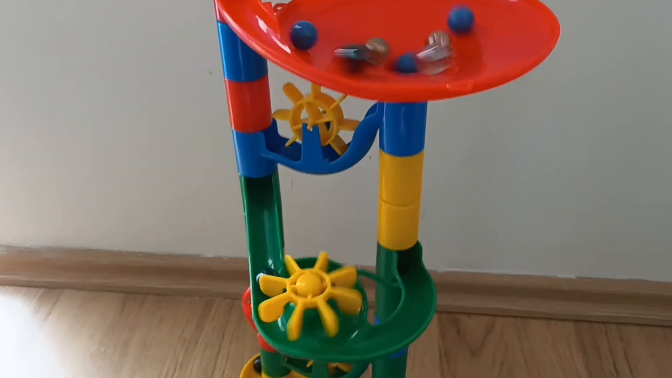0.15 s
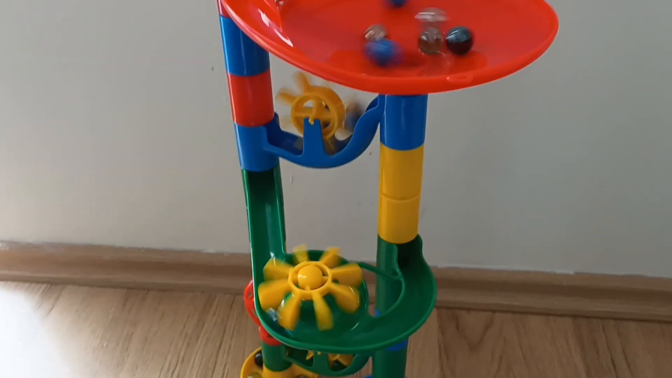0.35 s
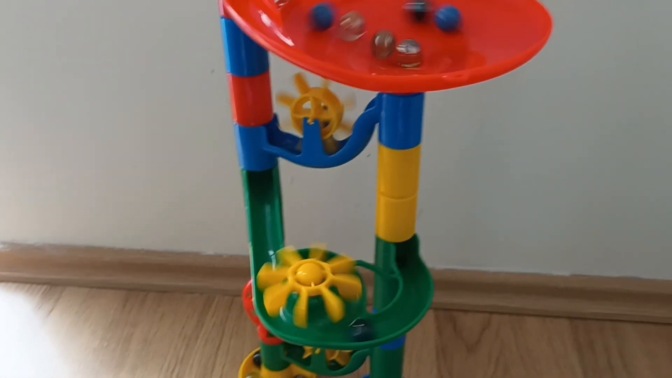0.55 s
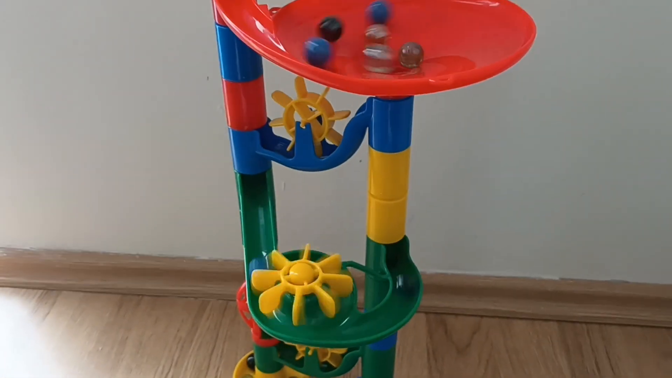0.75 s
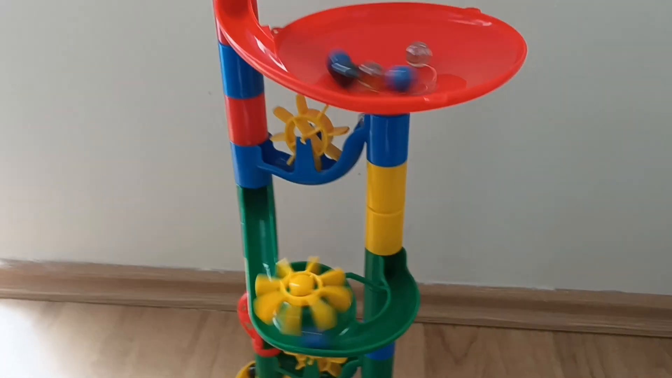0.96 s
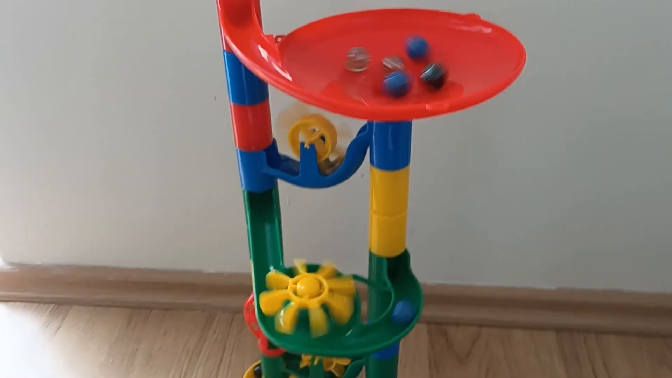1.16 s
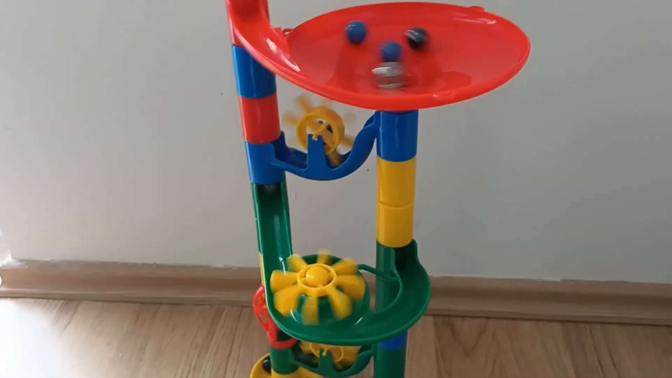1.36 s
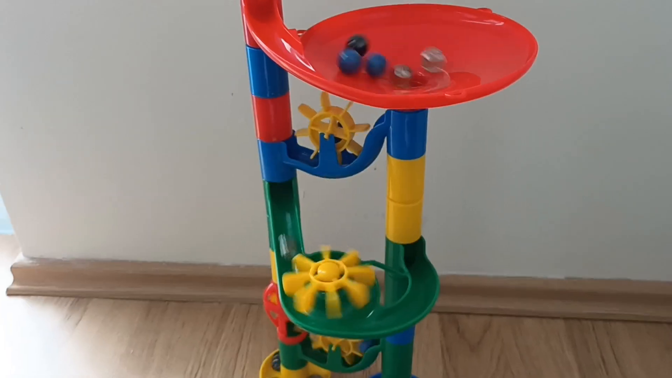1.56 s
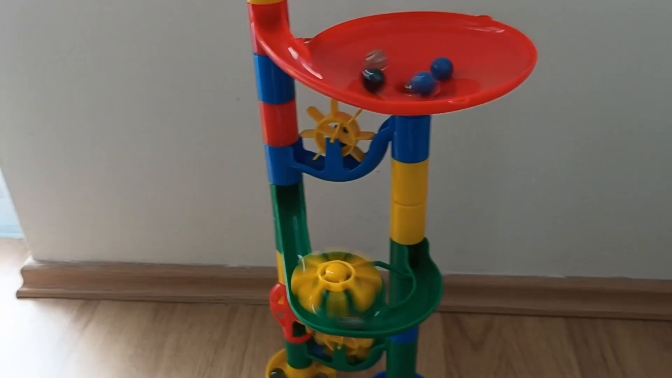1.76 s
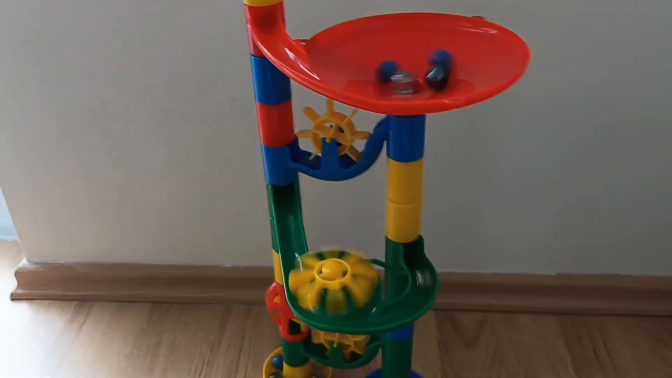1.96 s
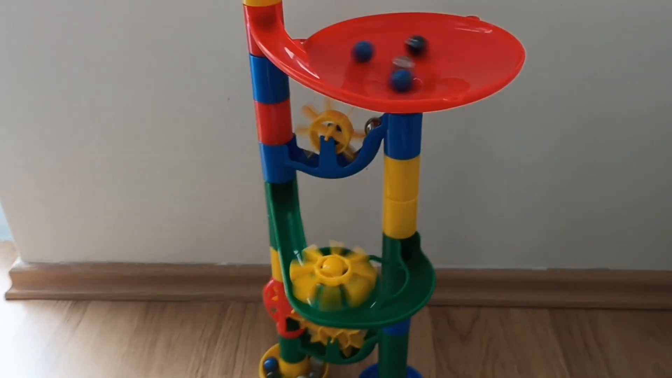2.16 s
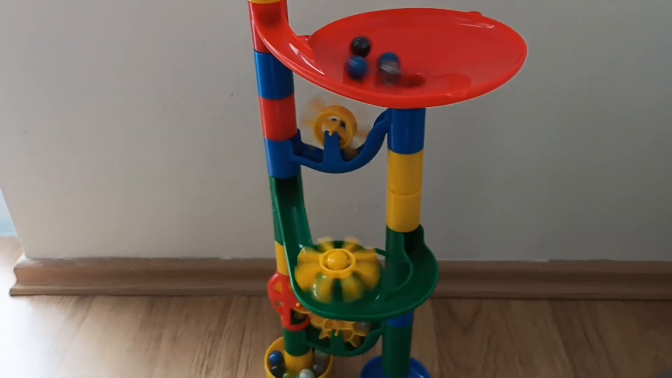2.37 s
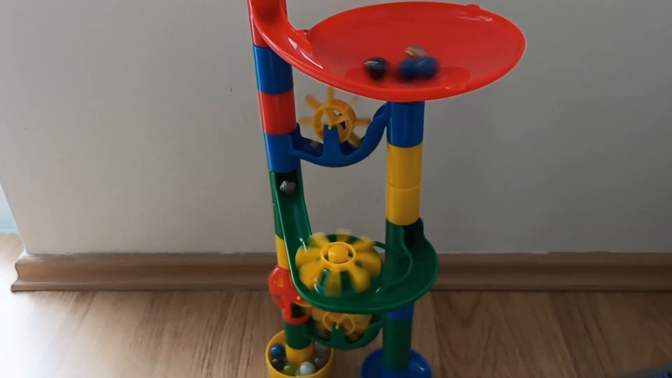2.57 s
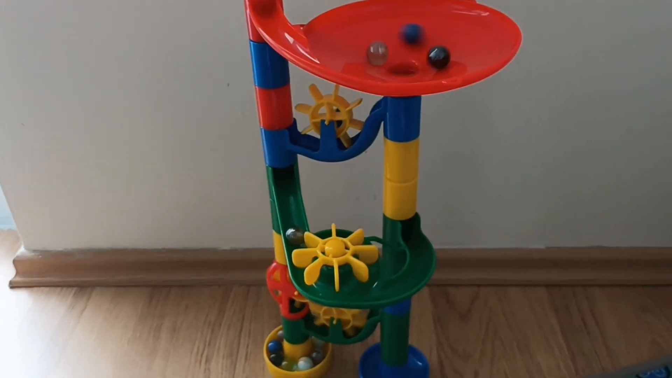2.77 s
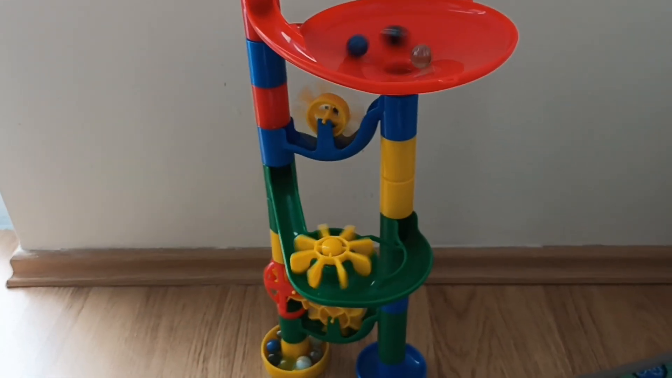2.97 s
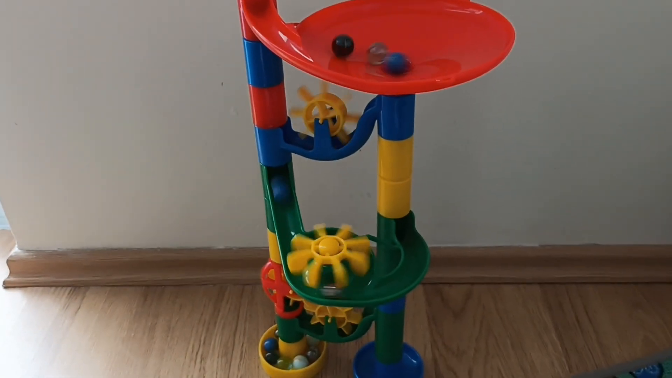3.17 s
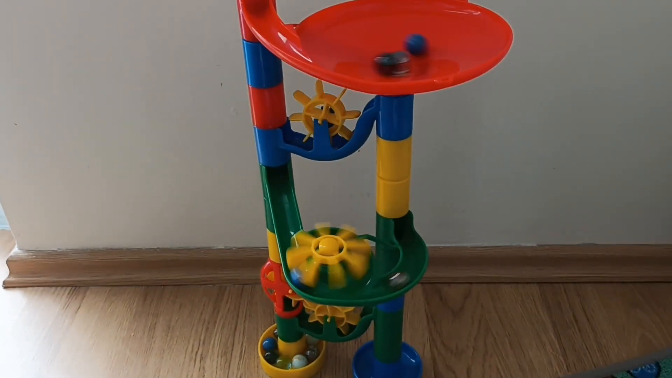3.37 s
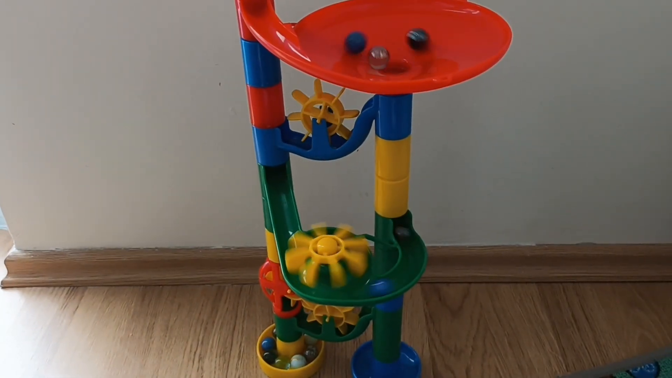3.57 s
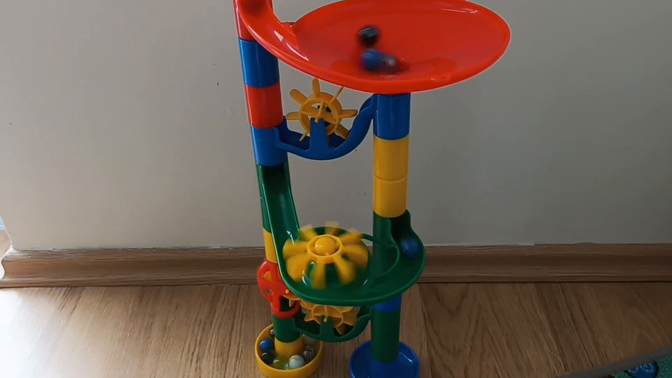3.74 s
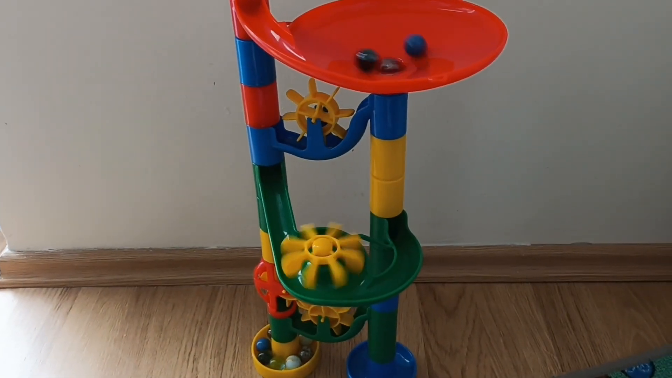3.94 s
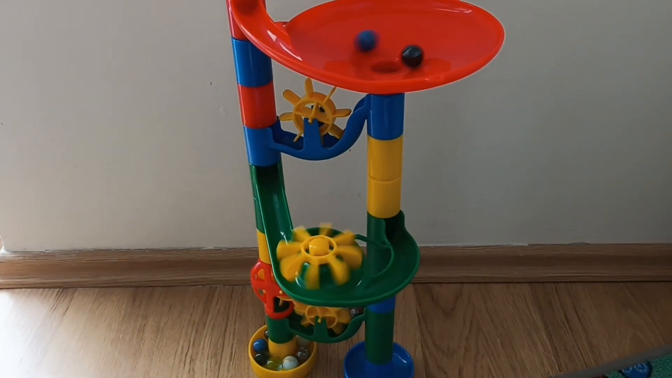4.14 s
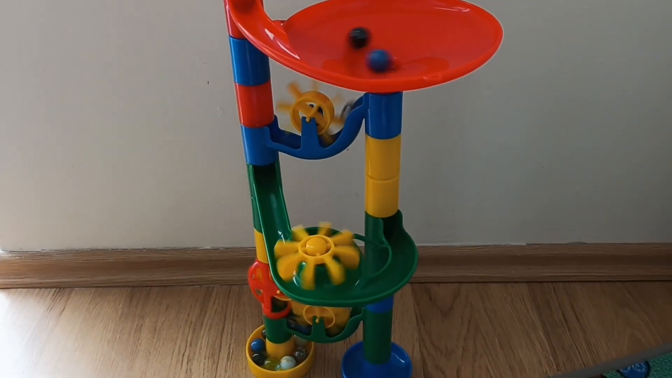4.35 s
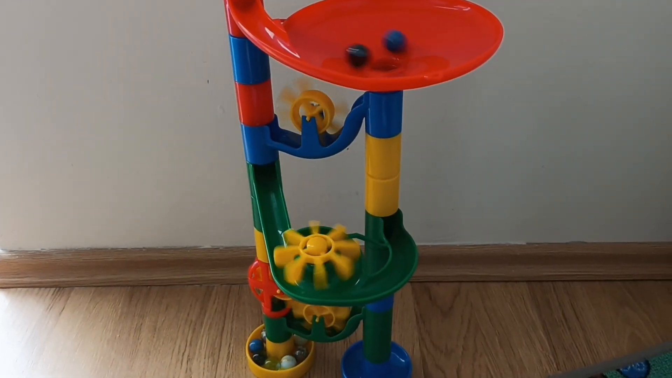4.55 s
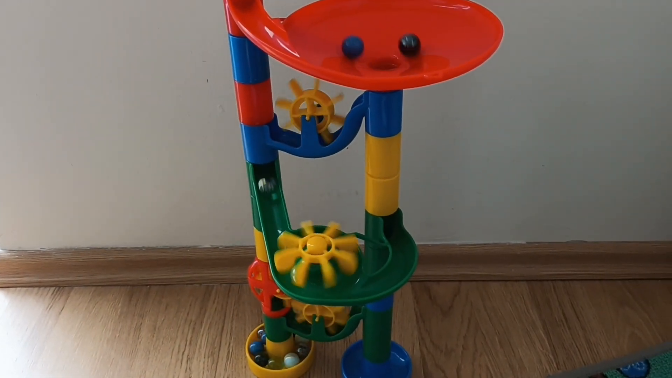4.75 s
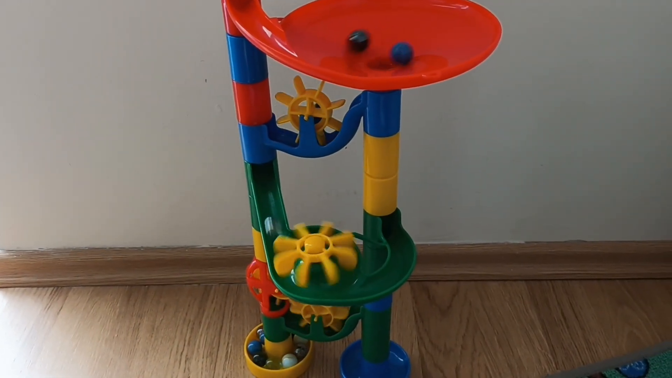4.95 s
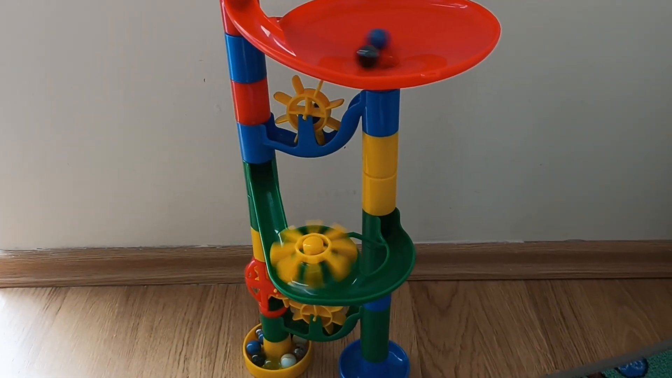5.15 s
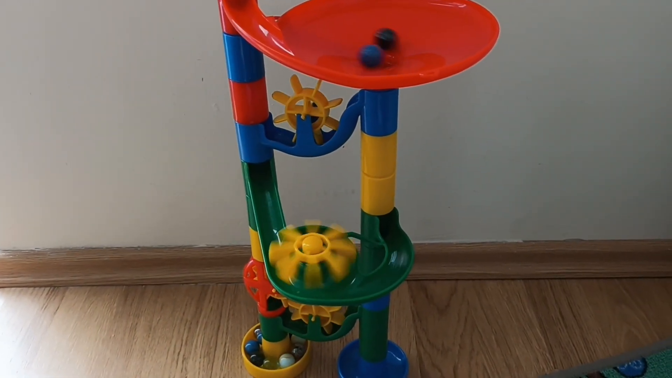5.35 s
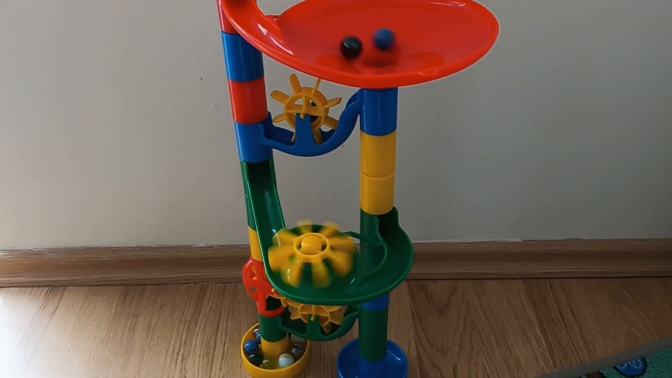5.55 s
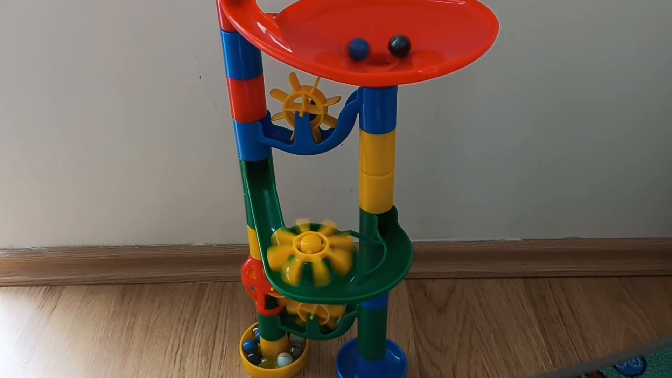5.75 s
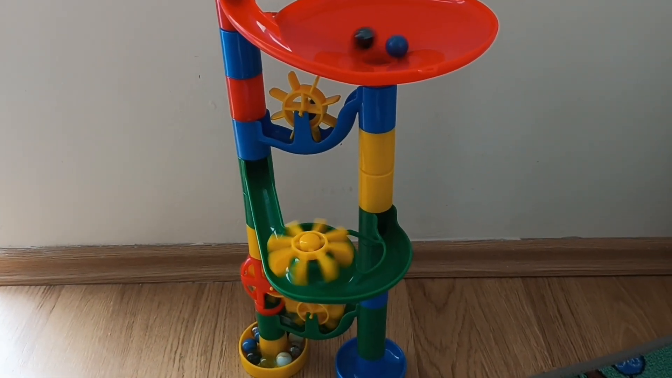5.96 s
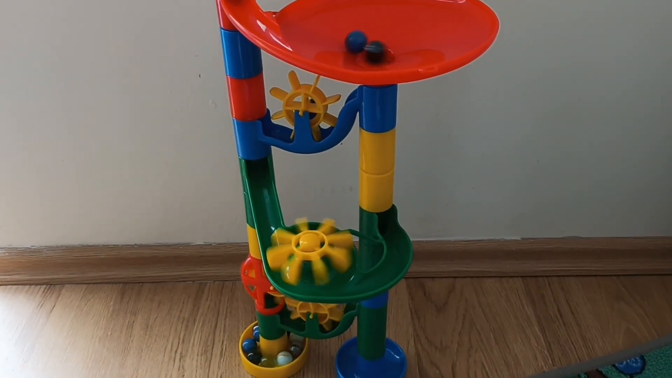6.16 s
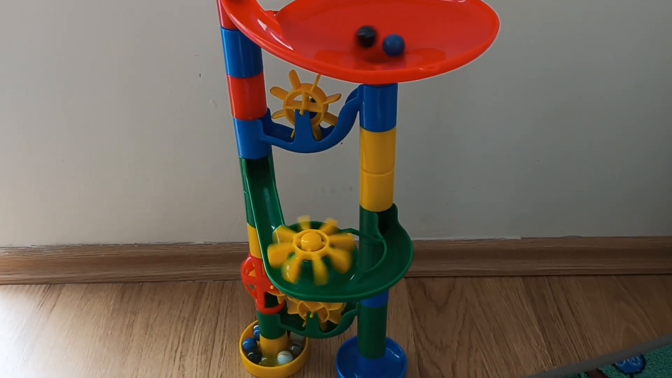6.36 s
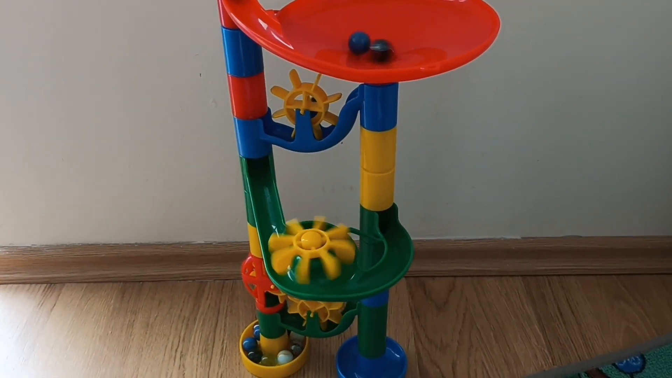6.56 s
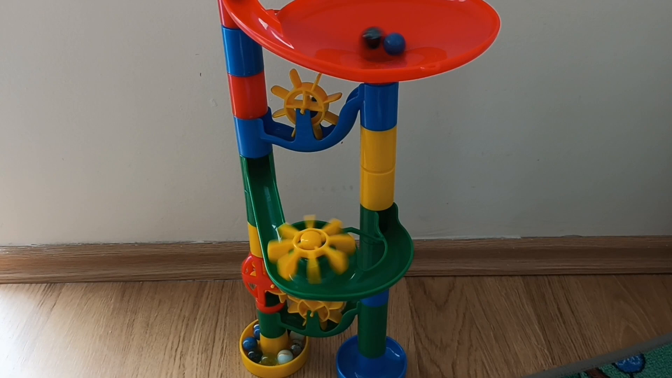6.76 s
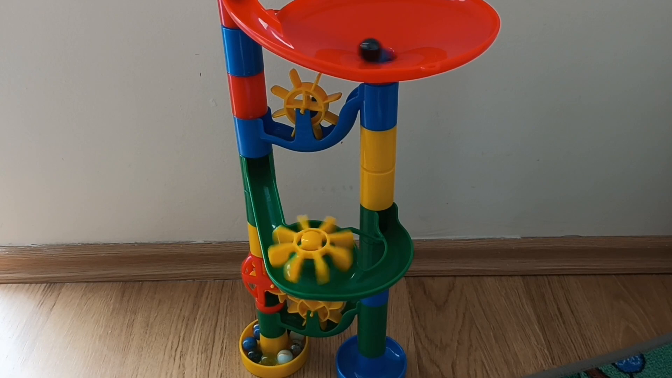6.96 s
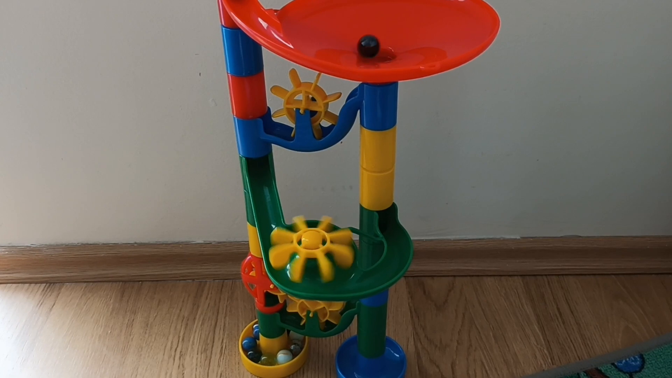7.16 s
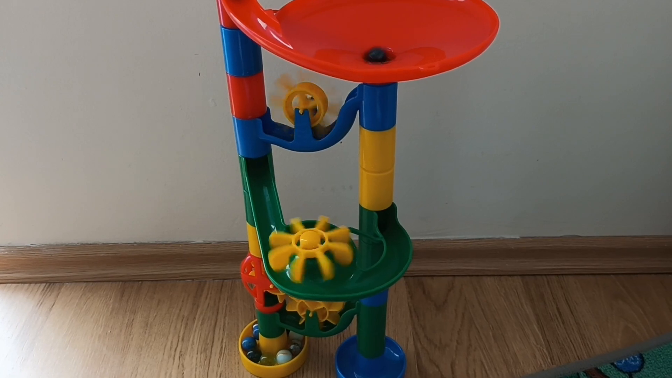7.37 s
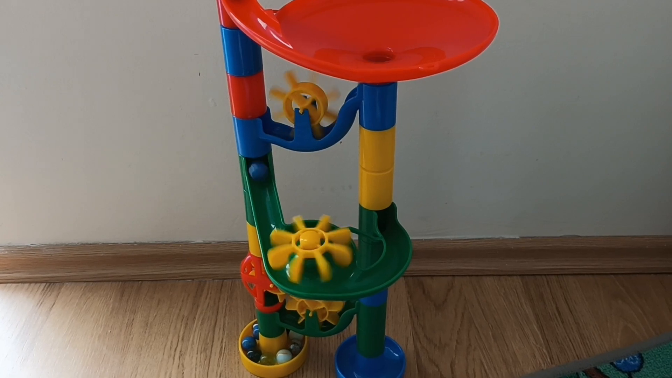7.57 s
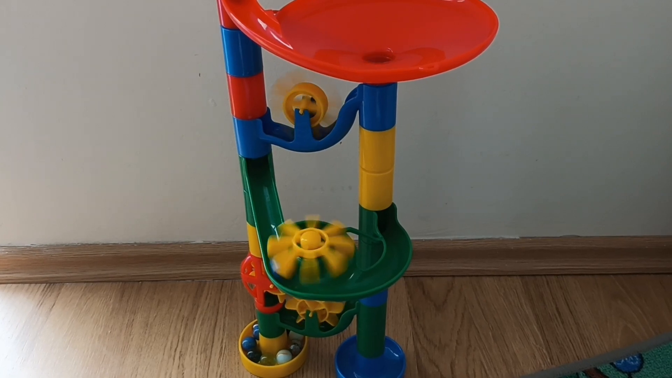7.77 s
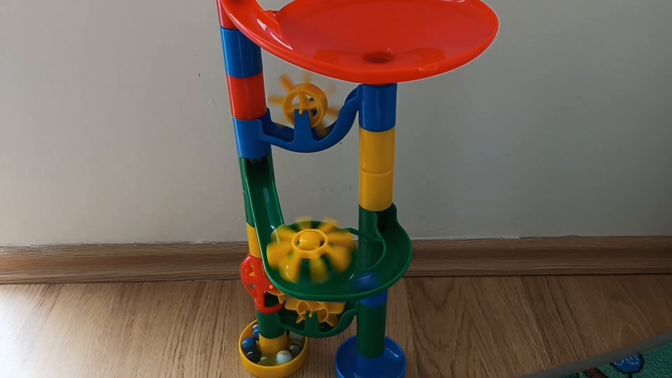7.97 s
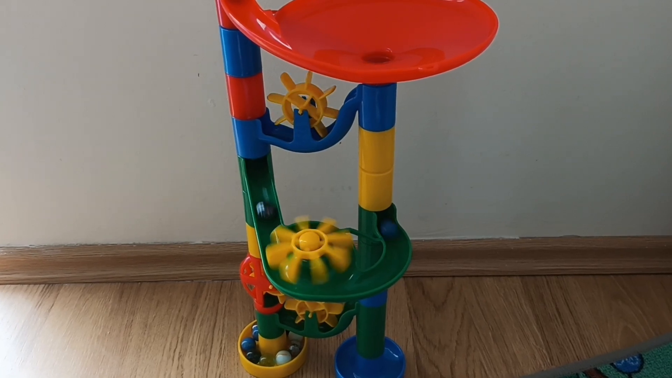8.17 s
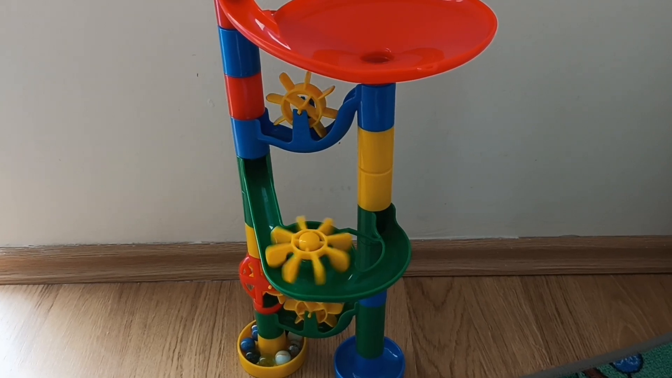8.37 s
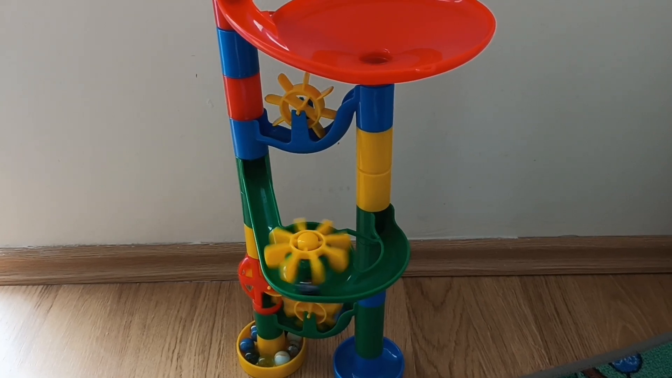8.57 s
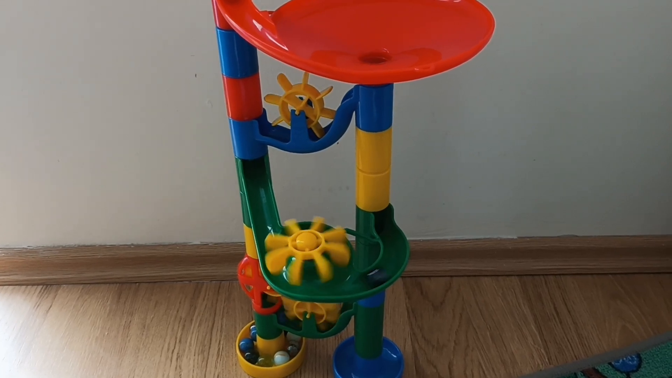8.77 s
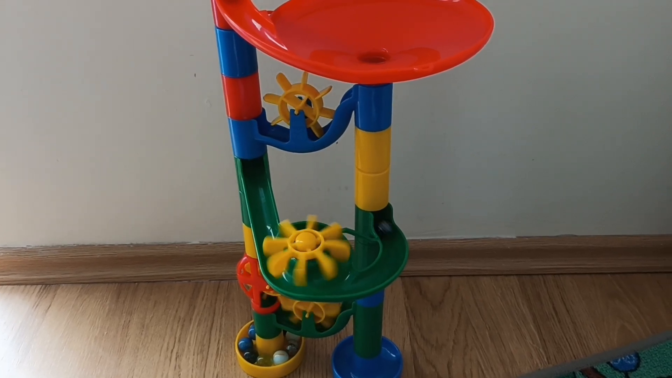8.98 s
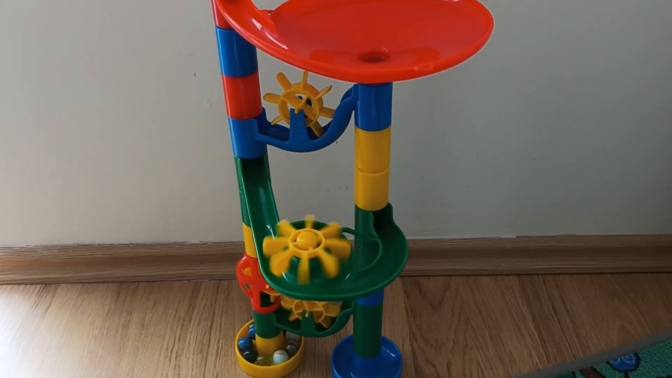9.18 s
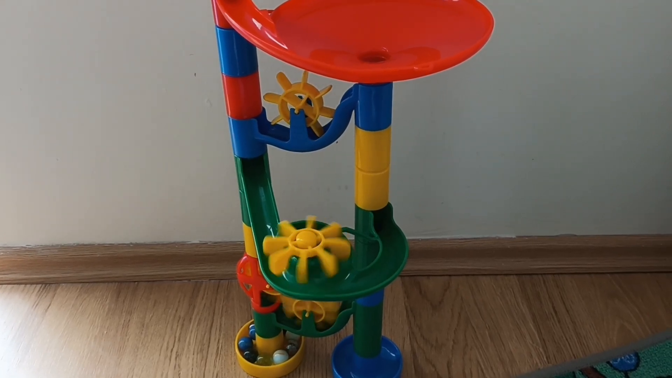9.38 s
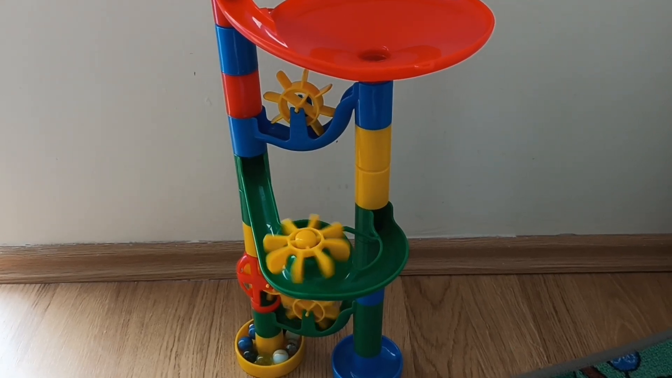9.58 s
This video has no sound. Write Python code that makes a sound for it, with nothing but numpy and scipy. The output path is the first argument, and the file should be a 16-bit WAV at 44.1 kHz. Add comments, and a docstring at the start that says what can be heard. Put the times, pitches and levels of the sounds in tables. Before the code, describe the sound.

Close and crisp, in a small lightly reverberant room: marbles hit thin hard plastic with dry clacks, skip down track pieces that briefly sing with shifting pitch, and click against one another with tiny bright ticks. The clatter is dense early, sparse in the middle with only gentle rolling, then busy again from about seven seconds, ending in scattered knocks and clinks over a very faint hush.

```python
"""Hard knocks, rattles and bright glass clinks over a soft hollow whirr: glass marbles run down a plastic
toy tower in a small room with a wooden floor. Knocks and clinks are decaying filtered noise with ringing modes;
rattles are random taps on plastic spots; track pieces sing as skips drive a shifting resonance.
The whirr is rough rolling contact on the modes of a funnel dish. Low bumps and a faint hush lie below."""
import sys
import numpy as np
from scipy import signal
from scipy.fft import rfft, irfft, next_fast_len
from scipy.io import wavfile

SR = 44100
rng = np.random.default_rng(int(sys.argv[2]) if len(sys.argv) > 2 else 0)


def waveform_to_disk(signal):
    """Save audio, clipped to [-1, 1], as 16-bit WAV at the path in sys.argv[1]."""
    frames = np.transpose(np.atleast_2d(signal))
    scaled = np.clip(frames, -1, 1) * 32767
    samples = np.round(scaled).astype(np.int16)
    wavfile.write(sys.argv[1], SR, samples)


N = 424237
T = np.arange(4096) / SR  # time within one blow [s]

# resonances of the plastic tower: (nominal frequency [Hz], mean level [dB], t60 [s])
TOWER_MODES = [(730, -9.5, 0.11), (963, 1.5, 0.096), (1185, -1.5, 0.061), (1296.5, -1.5, 0.14),
               (1414, -2.5, 0.08), (1632, 6, 0.15), (1790, -16, 0.3), (1804, 3.5, 0.45), (1930, 4.5, 0.042),
               (2910, 12, 0.084), (3502, 15.5, 0.02), (3970, 0, 0.085), (4256, 14.5, 0.031)]
# colour of the many short-lived plastic modes: (frequency [Hz], gain [dB])
PLASTIC_COLOUR = [(40, -66), (85, -24.5), (180, -29.5), (430, -20.5), (620, -24.5), (780, -10.5),
                  (1300, -7.5), (1800, 9), (2400, 3.5), (3800, 8), (6300, -2.5), (8200, -24),
                  (10100, -16.5), (13000, -34.5), (15400, -29)]
# colour of the first instant of contact: (frequency [Hz], gain [dB])
CRACK_COLOUR = [(3000, -30), (9000, -20.5), (13000, -41), (15000, 5)]


def amp(db):
    """Amplitude factor of a level in dB."""
    return 10 ** (np.asarray(db) / 20)


def unit(x):
    """Scales to rms 1."""
    return x / np.sqrt(np.mean(x ** 2) + 1e-20)


def blow(x):
    """Scales to rms 1 over the first 10 ms."""
    return x / np.sqrt(np.mean(x[..., :441] ** 2) + 1e-20)


def read(points, hz):
    """Interpolates a table on a log-frequency axis."""
    f, value = np.transpose(points)
    return np.interp(np.log(hz + 1), np.log(f + 1), value)


def colour(x, points):
    """Filters x with a spectrum in dB."""
    size = x.shape[-1]
    fast = next_fast_len(size)
    gain = amp(read(points, np.fft.rfftfreq(fast, 1 / SR)))
    return irfft(rfft(x, fast) * gain, fast)[..., :size]


def split(x, low_hz, high_hz):
    """Low, middle and high band of x."""
    size = x.shape[-1]
    fast = next_fast_len(2 * size)
    hz = np.fft.rfftfreq(fast, 1 / SR)
    spectrum = rfft(x, fast)
    low, below_high = (1 / (1 + (hz / edge) ** 10) for edge in (low_hz, high_hz))
    weights = [low, below_high - low, 1 - below_high]
    return [irfft(spectrum * w, fast)[..., :size] for w in weights]


def add(mix, s, sound):
    """Mixes a sound in at time s."""
    part = mix[:, round(s * SR):][:, :sound.shape[1]]
    part += sound[:, :part.shape[1]]


def pair(size, alike):
    """Two noises with correlation alike."""
    left, right = rng.standard_normal((2, size))
    return np.array([alike * right + np.sqrt(1 - alike ** 2) * left, right])


def place(x, pan_db):
    """Sets the left-right level at constant power and delays the left channel by a moment."""
    # possible left-channel delays: (delay [samples])
    lags = [45, 63]
    left = np.pad(x[0], (rng.choice(lags), 0))[:x.shape[1]]
    panned = np.array([left * amp(pan_db / 2), x[1] * amp(-pan_db / 2)])
    return panned / np.sqrt((amp(pan_db) + amp(-pan_db)) / 2)


def fade(rise_s, t60_s):
    """Envelope: vibration spreads through a part and dies."""
    return (1 - np.exp(-(T / rise_s) ** 2)) * amp(-60 * T / t60_s)


def mode(hz, t60_s, rise_s=0.00056):
    """One damped resonance, with a slightly different phase in each channel."""
    phase = 2 * np.pi * rng.random() + 0.77 * rng.standard_normal((2, 1))
    return fade(rise_s, t60_s) * np.sin(2 * np.pi * hz * T + phase)


def ring(modes, spread_db, detune):
    """A body's answer at one spot: every spot favours other modes."""
    answer = 0
    for hz, db, t60_s in modes:
        level = amp(db + spread_db * rng.standard_normal())
        tuned_hz = hz * (1 + detune * rng.standard_normal())
        answer = answer + level * unit(mode(tuned_hz, t60_s))
    return unit(answer)


def hills(x, depth_db, count=34):
    """Each place on the plastic lifts some bands and sinks others."""
    hz = np.geomspace(500, 16000, count)
    return colour(x, np.transpose([hz, depth_db * rng.standard_normal(count)]))


def taps(per_s, spread_db):
    """Random tiny impacts, a few of them much harder than the rest."""
    present = rng.random(N) < per_s / SR
    force = amp(spread_db * np.minimum(rng.exponential(1, N), 3))
    return present * force * rng.choice([-1, 1], N)


def wander(per_s):
    """A smooth random curve of rms 1, with components up to per_s Hz."""
    t = np.arange(0, N, 256) / SR
    rates_hz = per_s * rng.uniform(.2, 1, size=8)
    curve = sum(np.sin(2 * np.pi * (f * t + rng.random())) for f in rates_hz)
    return np.interp(np.arange(N) / SR, t, unit(curve))


def resonate(x, hz, width_hz):
    """A one-pole resonance that follows the curve hz."""
    turn = np.exp(2j * np.pi * np.cumsum(hz) / SR)
    r = np.exp(-np.pi * width_hz / SR)
    return 2 * (turn * signal.lfilter([1 - r], [1, -r], x / turn)).real


def knocks(rise_s=0.0048, clack_t60_s=0.018, body_t60_s=0.082, snap_t60_s=0.026, ring_t60_s=0.028,
           ring_db=-4, tower_db=-6, hills_db=4, crack_db=-8, snap_pan_db=-2, trim_db=-1):
    """Marble on plastic: a hard snap, then the clack of dense modes, with the struck part ringing on."""
    # marble on plastic: (time [s], clack level before trim [dB], pitch of the struck part [Hz],
    # body re clack [dB], snap re clack [dB], left-right [dB])
    plastic_hits = [(0.0089, -32, 4470, -6, -2.5, -11), (0.0392, -20, 4370, -36, -2, 0),
                    (0.083, -39, 2910, -8, -21, -1), (0.1051, -13.5, 4690, -37, -14, 5),
                    (0.2308, -30.5, 3820, 2, 7.5, 0), (0.4044, -18.5, 3220, -10, -7.5, 0),
                    (0.4586, -17.5, 4050, -20, -13, 5), (0.5934, -38, 3900, 1, 9, 0),
                    (0.619, -35, 6950, -15, 9, -2), (0.6314, -28, 4340, -14, 1, 8),
                    (0.727, -17.5, 2910, -21, -7, 0), (0.7853, -18, 4430, -4.5, -1.5, 1),
                    (0.8562, -16, 4520, -30, -30, -3), (0.8888, -26, 4000, -25, 3.5, 1),
                    (0.8995, -20, 4120, -18, -8, 1), (0.932, -27.5, 4370, -22, -8, -16),
                    (0.958, -16.5, 3830, -12.5, -7, 2.5), (1.1547, -21, 3810, -13, -17, -4),
                    (1.1725, -20, 3005, -9, -11, -3), (1.206, -19.5, 3900, -21, -10, -4),
                    (1.249, -21.5, 3500, -3.5, -3, -6), (1.285, -24, 3450, -3, 0.5, -1),
                    (1.4346, -24.5, 3520, -11, -10, -6), (1.4704, -26.5, 3260, -1.5, 2.5, -3.5),
                    (1.7, -22.5, 3220, -24, -4.5, -5), (1.7273, -21.5, 3700, -12.5, -29, -10),
                    (1.7418, -19, 3800, -30, -1.5, -0.5), (1.78, -29.5, 4050, -24, -18, 11),
                    (1.8022, -23, 5000, -5, 0.5, -4), (1.857, -20.5, 1630, -24, -6.5, 1),
                    (1.883, -17, 4340, -29, -9, -1), (1.923, -25, 4270, -5, -1, -2),
                    (2.0086, -33.5, 4540, -23, 8.5, -2), (2.03, -29.5, 4210, 2, -2, -6),
                    (2.042, -24, 5800, -6, -1, -3), (2.118, -27, 3520, -15, 5, -11),
                    (2.139, -20.5, 4170, -12, -23, 4), (2.2038, -18.5, 4230, -10.5, -8, -8),
                    (2.2356, -22, 3190, -9.5, -2.5, -2), (2.2597, -23, 3970, -23, -9, -10),
                    (2.297, -22.5, 4100, -33, -1, 0), (2.434, -37, 1940, 7.5, 2, -4),
                    (2.5224, -22.5, 3010, -31, -6, -13), (2.564, -21.5, 4280, -27, -2, -18),
                    (2.6502, -24.5, 3654, -18, -9, -5), (2.7532, -28.5, 2060, -10, 1, -3),
                    (2.7896, -28.5, 2020, -2.5, -5.5, -4), (2.912, -20.5, 3750, -16, -4, -1.5),
                    (2.939, -35, 3750, -16, -18, 12), (2.9654, -22, 4050, -4.5, -7, -1),
                    (3.0218, -23, 4120, -7.5, -4.5, -1), (3.0701, -22, 5630, -16, -12, -1),
                    (3.177, -32, 1714, 1.5, 3, 2), (3.468, -21, 4090, -7, -3, 0),
                    (3.5767, -22, 3960, -5.5, -2, -1.5), (3.589, -30, 3930, -6, 4, 0),
                    (3.6767, -23, 3530, -12, -16, -4), (3.69, -28.5, 3630, -8, 2, -11),
                    (3.7089, -20.5, 3920, -15, -3, -1), (3.7674, -22.5, 3530, -12, -4, -5),
                    (3.7818, -24, 3600, -14, 1, -12), (3.807, -24, 3510, -18, -10, 10),
                    (3.8306, -23, 3960, -18, 2, -5), (3.8588, -20.5, 4080, -7, -5.5, -2),
                    (3.9791, -20, 3940, -6.5, -4, -2), (4.07, -19.5, 3420, -13, -8.5, -9),
                    (4.095, -35, 3400, 3, -24, -3), (4.119, -29, 3470, -9, -17, -6),
                    (4.141, -26, 3590, -7, -10, -3), (4.158, -36, 3530, 3, -11, -2),
                    (4.2498, -22.5, 3610, -18.5, -2.5, -4), (4.2917, -19.5, 3650, -27, -5, -3),
                    (4.3882, -22, 3700, -18, 1, -5), (4.399, -17.5, 2970, -13, -13, 2),
                    (4.421, -19.5, 4070, -18, -19, -3), (4.454, -19.5, 2940, -18, -13, 0),
                    (4.49, -23.5, 5040, -29, -0.5, -6), (5.338, -22.5, 2910, -10, -3.5, -4),
                    (5.3988, -29, 2910, -15, 2, 1), (5.424, -19.5, 4530, -7.5, -4.5, -1),
                    (5.4887, -22.5, 3490, -8, 1.5, -3), (5.5104, -18.5, 3480, -11, -6.5, -1),
                    (5.845, -22, 3770, -14, -2.5, -2.5), (5.87, -27, 3210, -18, -17, 1),
                    (5.8813, -21, 5100, -29, 1, 0.5), (6.806, -26.5, 4720, -20, -14, -14),
                    (6.8369, -28, 3750, 1.5, 1, 2), (6.9001, -15, 4600, -13, -6.5, 0),
                    (6.964, -22.5, 1810, -10, -6, 1), (7.014, -25, 3230, -5, -18, 2),
                    (7.081, -26.5, 4770, -3, -4, 1), (7.1355, -31.5, 3900, -5, 2, 0),
                    (7.1668, -31, 1980, 5, -4, -6), (7.3505, -21.5, 3700, -8, -4.5, -10),
                    (7.374, -17.5, 3790, -10, -5, 0), (7.401, -28, 2900, -18, -5, -5),
                    (7.4847, -27, 1980, -4, 5, -1), (7.5586, -31.5, 2050, -20, 4, -17),
                    (7.5975, -25, 1936, 2.5, -2, 0), (7.718, -23, 3000, -5, -4, -4),
                    (7.744, -31, 4360, -14, -14, 4), (7.7699, -14.5, 4060, -14.5, -7.5, 1.5),
                    (7.848, -22, 3640, -8, -7.5, 0.5), (7.9042, -29.5, 2020, 3.5, -11, -0.5),
                    (8.0675, -19.5, 2910, -7, -7.5, 0), (8.1492, -23.5, 2910, -1, -0.5, -5),
                    (8.159, -22.5, 4080, -4, -1, 1), (8.2222, -15.5, 4050, -13.5, -4, -1.5),
                    (8.687, -22.5, 3440, -14.5, -3, 0), (8.694, -20.5, 5600, -16.5, 0, 0),
                    (8.877, -22.5, 2950, -4.5, -2, -5), (8.986, -21.5, 1804, -21, -3.5, 5),
                    (8.9965, -22.5, 4050, -1, 2, -17), (9.0494, -18, 4030, -7, -4, -3),
                    (9.307, -30, 4010, -11, -14, -1), (9.348, -23, 4390, -25, -2, -2.5),
                    (9.3895, -24.5, 3980, -8.5, -0.5, 0)]
    out = np.zeros((2, N))
    for s, db, hz, body_db, snap_db, pan_db in plastic_hits:
        dense = hills(colour(pair(len(T), alike=0.2), PLASTIC_COLOUR), hills_db)
        body, clack, snap = split(dense, low_hz=2600, high_hz=7440)

        part_ring = blow(mode(hz, ring_t60_s, rise_s))
        clack = blow(blow(clack * fade(rise_s, clack_t60_s)) + amp(ring_db) * part_ring)

        tower = blow(ring(TOWER_MODES, spread_db=8.0, detune=0.022))
        body = blow(blow(body * fade(rise_s, body_t60_s)) + amp(tower_db) * tower)

        crack = blow(colour(pair(len(T), alike=0.71), CRACK_COLOUR) * fade(0.000096, 0.0024))
        snap = blow(blow(snap * fade(0.0017, snap_t60_s)) + amp(crack_db) * crack)
        snap *= amp([[snap_pan_db / 2], [-snap_pan_db / 2]])  # the treble beams to the right

        sound = clack + amp(body_db) * body + amp(snap_db) * snap
        add(out, s, amp(db + trim_db) * place(sound, pan_db))
    return out


def spurt_levels(creep_db=-63.5):
    """Amplitude curves of boom, clatter and fizz: each spurt jumps up, drifts in level and dies away."""
    # marbles chatter over one stretch of track: (start [s], length [s], mid-spurt clatter level before
    # trim [dB], boom re clatter [dB], fizz re clatter [dB])
    spurts = [(0.0, 0.16, -27.5, -42, -14), (0.222, 0.054, -27.5, -11, -5), (.405, .11, -25.5, -10.5, -24),
              (.632, 0.03, -27, -8, -18), (.735, 0.084, -26, -12, -3.5), (.795, 0.12, -25, -5, -2.5),
              (.97, 0.052, -30, -5, -8), (1.035, 0.042, -30.5, -5.5, -11), (1.18, 0.25, -24.5, -9, -5.5),
              (1.31, 0.13, -22, -12, -3), (1.47, 0.053, -19.5, -12, -13.5), (1.55, 0.019, -35, -16, -16),
              (1.72, 0.18, -29.5, -11.5, -27), (1.875, 0.097, -21, -12.5, -14),
              (2.015, 0.15, -25.5, -9.5, -9), (2.25, .12, -22.5, -13, -10), (2.435, 0.12, -33, -19, -11),
              (2.531, 0.16, -23, -17, -5.5), (2.785, 0.02, -22, -27, -14), (2.92, 0.087, -25, -31, -15),
              (3.075, 0.11, -42.5, 0.5, 3), (3.174, 0.015, -33, -13, 0), (3.468, 0.042, -26, -11.5, -24),
              (3.585, 0.11, -24, -12, -8.5), (3.705, 0.2, -23, -10.5, -8.5), (3.91, 0.14, -23, -13, -8),
              (4.115, 0.062, -29.5, -4, 0), (4.269, 0.087, -26.5, -14, -15),
              (4.395, 0.17, -27.5, -15, -7.5), (4.78, 0.03, -47, -2, -7), (4.872, 0.023, -43, -5, -12),
              (5.339, 0.044, -27, -14, -20), (5.43, .14, -26, -9.5, -7), (5.619, 0.037, -30.5, -4, -5),
              (5.752, 0.014, -39.5, -7, -17), (5.87, 0.061, -30, -10.5, 0), (6.785, 0.025, -35, -20, -21),
              (6.814, 0.058, -22.5, -22, -11), (6.905, 0.11, -25, -12.5, -19),
              (7.149, 0.077, -23.5, -9, -17), (7.27, 0.18, -35.5, -26, -18), (7.376, 0.12, -23.5, -8.5, -5),
              (7.535, 0.12, -27, -8.5, -8), (7.725, 0.038, -37.5, -1, -14), (7.785, 0.13, -30, -6.5, -6),
              (8.078, 0.13, -26, -6, -2), (8.232, 0.14, -24, -8, -5.5), (8.462, 0.088, -40.5, -6.5, -31),
              (8.598, 0.017, -29.5, -8.5, -15), (8.695, 0.08, -29, -13.5, -3),
              (8.886, 0.033, -21, -13.5, -13), (8.995, 0.2, -28, -6.5, -2.5),
              (9.272, 0.0096, -21.5, -14.5, -14), (9.379, 0.034, -28.5, -17, -6.5)]
    # for boom, clatter, fizz: (attack time constant [s])
    attack_s = [0.004, 0.0075, 0.0068]
    # for boom, clatter, fizz: (fall from start to end of a spurt, negative is a rise [dB])
    sag_db = [-1.5, 0.5, 7]
    # for boom, clatter, fizz: (release rate [dB/s])
    release_db_per_s = [209, 319, 248]
    t = np.arange(0, N, 64) / SR
    attack, sag, release = np.array([attack_s, sag_db, release_db_per_s])[:, :, None]
    power = np.full((3, len(t)), amp(creep_db) ** 2)  # faint ticking of slow marbles
    for s, length_s, db, boom_db, fizz_db in spurts:
        age = np.maximum(t - s, 0)
        fall_db = sag * (np.minimum(age / length_s, 1) - .5) + release * np.maximum(age - length_s, 0)
        band_db = db + np.array([[boom_db], [0], [fizz_db]])
        power += ((1 - np.exp(-age / attack)) * amp(band_db - fall_db)) ** 2
    return [np.interp(np.arange(N) / SR, t, np.sqrt(p)) for p in power]


def rattle(count=20, taps_per_s=600, clump_db=2.5, tap_t60_s=0.034, tower_db=-3, roam_db=7, hills_db=4,
           soft=0.77, hard=1.96, trim_db=-3.0):
    """Marbles skip over seams and paddles; one spot of the track after another takes the taps."""
    bands = np.zeros((3, 2, N))
    shares = np.array([amp(roam_db * wander(per_s=5)) for _ in range(count)])
    clumps = amp(clump_db * np.tanh(wander(per_s=60)))
    hits = taps(taps_per_s, spread_db=2.5) * clumps
    at = np.flatnonzero(hits)
    odds = np.cumsum(shares[:, at] ** 2, axis=0)
    struck = (odds < rng.random(len(at)) * odds[-1]).sum(axis=0)  # the spot on which each tap lands
    for k in range(count):
        noise = colour(pair(len(T), alike=0.16), PLASTIC_COLOUR)
        dense = unit(hills(noise, hills_db) * fade(0.00055, tap_t60_s))
        tower = ring(TOWER_MODES, spread_db=11.0, detune=0.012)
        spot = place(unit(dense + amp(tower_db) * tower), 0)
        answers = split(spot, low_hz=1446, high_hz=7140)
        # a harder tap has a shorter contact, so its treble grows faster than its bass
        for band, answer, growth in zip(bands, answers, (soft, 1, hard)):
            answer = answer * (T < .07)
            for n in at[struck == k]:
                add(band, n / SR, np.sign(hits[n]) * abs(hits[n]) ** growth * answer)
    return amp(trim_db) * sum(level * unit(band) for level, band in zip(spurt_levels(), bands))


def clinks(tick_t60_s=0.038, ring_db=-4, crack_db=-8):
    """Glass meets glass: a needle-sharp crack and a short, high tick with a brief ring."""
    # marble on marble: (time [s], level [dB], pitch [Hz], left-right [dB])
    glass_hits = [(0.1745, -24, 9700, -3), (0.1883, -31, 10900, -17), (0.198, -18, 9850, 0),
                  (0.314, -37, 11050, 2), (0.5077, -27.5, 9970, 1), (0.595, -47, 11100, -3),
                  (0.65, -29.5, 7900, 3), (0.687, -39, 9720, 2), (0.767, -25, 10200, -1),
                  (1.027, -21.5, 9620, -1), (1.073, -23.5, 9130, 4), (1.1393, -20, 10130, -3),
                  (1.377, -27, 10100, -15), (1.588, -32, 10200, -5), (1.637, -33.5, 7100, -5),
                  (1.812, -34, 11500, -2), (2.067, -27.5, 10400, -13), (2.19, -23.5, 11000, -3),
                  (2.705, -25.5, 10620, -10), (3.112, -24.5, 9900, -7), (3.14, -24, 9580, -7),
                  (3.874, -24, 10130, -1), (3.953, -23, 10020, -6), (4.1113, -19, 10440, -6),
                  (4.341, -26, 10440, -9), (4.481, -48, 9650, -8), (4.8666, -26, 8450, 2),
                  (5.559, -26.5, 9900, -7), (5.573, -23, 9900, -5), (5.598, -22, 11560, -4),
                  (5.7516, -34, 9700, -7), (5.766, -33, 8600, 2), (6.8205, -27, 11650, -13),
                  (7.115, -28, 10740, -17), (7.177, -24.5, 10900, -3), (7.218, -33, 10300, 0),
                  (7.522, -25.5, 10100, -6), (7.536, -31, 10500, 2), (7.579, -27, 8360, 2),
                  (8.134, -27, 9820, -6), (8.3598, -21, 10000, -1), (8.447, -28.5, 9470, -3),
                  (8.577, -34.5, 9740, -9), (9.0957, -29, 9860, 4), (9.1082, -19.5, 9750, -6),
                  (9.208, -24, 10800, -2), (9.229, -29, 10520, -6), (9.2743, -23.5, 9640, -8)]
    # colour of a glass clink: (frequency [Hz], gain [dB])
    glass_colour = [(500, -56), (1800, -25), (5000, -5), (7500, 16.5), (9000, 9), (10200, 27.5),
                    (11300, 18), (13000, -103), (15300, 16)]
    out = np.zeros((2, N))
    for s, db, hz, pan_db in glass_hits:
        tick = blow(colour(pair(len(T), alike=0.83), glass_colour) * fade(0.00017, tick_t60_s))
        crack = blow(colour(pair(len(T), alike=0.4), CRACK_COLOUR) * fade(.0002, 0.011))
        tone = blow(mode(hz, t60_s=.03, rise_s=.0005))
        sound = blow(tick + amp(ring_db) * tone + amp(crack_db) * crack)
        add(out, s, amp(db) * place(sound, pan_db))
    return out


def runs(width_hz=25, width_share=0.049, smear=0.71, fall_db=7, taps_per_s=260, trim_db=-1):
    """Quick, weakening skips drive one resonance of a track piece, which shifts as the marble travels."""
    # a marble makes one piece of track sing: (start [s], length [s], first pitch [Hz], last pitch [Hz],
    # level before trim and end fades [dB])
    songs = [(0.0, 0.2, 1640, 1630, -42), (0.793, 0.28, 720, 776, -37), (1.006, 0.21, 1820, 2000, -31),
             (1.273, 0.11, 3850, 3970, -28), (2.118, 0.095, 730, 754, -39.5),
             (2.216, 0.23, 4020, 3980, -30), (2.436, 0.19, 4520, 4600, -37.5),
             (2.608, 0.12, 930, 1204, -37), (2.743, 0.079, 1930, 1930, -27.5),
             (3.05, 0.071, 5560, 5730, -28.5), (3.656, 0.3, 730, 727, -40), (3.77, 0.12, 1790, 1630, -27),
             (3.87, 0.11, 4600, 4700, -28.5), (3.974, 0.11, 1230, 1520, -31),
             (4.079, 0.115, 3510, 3530, -28.5), (4.474, 0.13, 1140, 1340, -34),
             (5.325, 0.14, 2950, 2910, -28), (5.413, 0.073, 1790, 1820, -28.5), (5.46, 0.11, 770, 720, -38),
             (5.86, 0.094, 955, 1150, -35), (6.81, .15, 4565, 4565, -46), (6.89, 0.16, 1340, 1750, -30.5),
             (7.172, 0.1, 4600, 4600, -38), (7.427, 0.047, 1770, 1520, -29),
             (8.062, 0.054, 2940, 2910, -31), (8.221, 0.13, 714, 710, -35.5),
             (8.242, 0.13, 1630, 1800, -30.5), (8.572, .1, 1150, 1350, -42), (9.026, 0.11, 753, 726, -35),
             (9.126, 0.059, 1590, 1680, -28), (9.257, 0.17, 1110, 1200, -41)]
    out = np.zeros((2, N))
    skips = taps(taps_per_s, spread_db=5.0)
    for s, length_s, first_hz, last_hz, db in songs:
        drive = skips[round(s * SR):][:round(length_s * SR)]
        size = len(drive)
        tick = pair(len(T), alike=0.68) * fade(0.000093, 0.018)
        contact = signal.oaconvolve(drive[None], tick, axes=1)[:, :size]
        hz = np.linspace(first_hz, last_hz, size)
        # high and far-shifting resonances are broader
        width = width_hz + width_share * first_hz + smear * abs(last_hz - first_hz)
        tone = resonate(resonate(contact, hz, width), hz, width)
        song = unit(tone * amp(-fall_db * np.linspace(0, 1, size)))
        add(out, s, amp(db + trim_db) * place(song * signal.windows.tukey(size, .3), 0))
    return out


def funnel(count=8, grain_db=-4, swell_db=4.5, trim_db=-1):
    """Rolling glass feels the dish's roughness; spots with their own mode mixes swell and sink in turn."""
    # level of the marbles circling the funnel: (time [s], level before trim [dB])
    circling = [(0, -34.5), (.6, -44.5), (1.65, -39.5), (2.399, -44.5), (3.35, -41), (4.7, -44.5),
                (5.0, -46.5), (5.25, -44), (5.8, -44.5), (6.15, -45.5), (6.45, -52), (6.68, -46.5),
                (6.76, -52), (7.25, -34), (7.4, -44), (7.6, -100)]
    # resonances of the funnel dish: (nominal frequency [Hz], mean level [dB], t60 [s])
    dish_modes = [(720, -21.5, 0.056), (953, -14, 0.027), (1300, -11.5, 0.45), (1416, -9, 0.19),
                  (1540, -17, 0.027), (1636, -6.5, 0.041), (1655, -11.5, 0.055), (1930, -3.5, 0.047),
                  (2020, -22, 0.047), (2170, -17, 0.023), (2860, -11, 0.017), (3470, -17, 0.024),
                  (3900, -17, 0.017)]
    # colour of the rolling contact: (frequency [Hz], gain [dB])
    rolling_colour = [(60, -44), (400, -22), (800, -36), (1900, -2.5), (3000, -14), (5000, -29.5),
                      (8000, -28), (16000, -38)]
    out = np.zeros((2, N))
    for _ in range(count):
        grain = unit(colour(pair(len(T), alike=0.91), rolling_colour) * fade(0.00036, 0.012))
        hollow = ring(dish_modes, spread_db=4, detune=0.008)
        dish = place(hollow + amp(grain_db) * grain, 0)
        swell = amp(swell_db * np.tanh(wander(per_s=9)))
        contact = taps(per_s=450, spread_db=5.0) * swell
        out += signal.oaconvolve(contact[None], dish, axes=1)[:, :N]
    level_db = np.interp(np.arange(N) / SR, *np.transpose(circling))
    return amp(trim_db + level_db) * unit(out)


def bumps(t60_s=0.19):
    """Dull low thuds under the clatter: dark noise that rises fast and dies."""
    # soft low bumps: (time [s], level [dB])
    thuds = [(0.53, -57), (0.636, -53.5), (.726, -57), (1.823, -64), (2.331, -65), (2.987, -64),
             (7.142, -61), (7.42, -63), (7.8, -59), (8.087, -63), (8.901, -62)]
    # colour of a bump: (frequency [Hz], gain [dB])
    thud_colour = [(20, -35), (60, -13), (85, 10), (130, -4), (220, -9), (400, -18), (2000, -71)]
    out = np.zeros((2, N))
    for s, db in thuds:
        thud = colour(pair(len(T), alike=0.78), thud_colour) * fade(0.0021, t60_s)
        add(out, s, amp(db) * unit(thud * signal.windows.tukey(len(T), .2)))
    return out


def room(x, first_s=0.0046, build_s=0.0012):
    """Wall and floor answer within milliseconds; a noise tail dies at a rate set by frequency."""
    # decay of the room: (frequency [Hz], t60 [s])
    decay = [(150, 0.38), (800, 0.22), (2000, 0.38), (5500, 0.25), (10000, 0.21), (16000, 0.17)]
    hz, t, z = signal.stft(rng.standard_normal((2, SR // 2)), SR, nperseg=256)
    z = z * amp(-60 * t / read(decay, hz)[:, None])
    tail = signal.istft(z, SR, nperseg=256)[1]
    tail *= np.clip((np.arange(tail.shape[1]) / SR - first_s) / build_s, 0, 1)
    return signal.fftconvolve(x, tail / np.linalg.norm(tail[0]), axes=1)[:, :N]


def hush(level_db=-72):
    """The room's faint steady hush: coloured noise."""
    # colour of the hush: (frequency [Hz], gain [dB])
    air_colour = [(20, -10), (90, 10.5), (250, -24), (1000, -9), (4000, -1), (16000, -39)]
    return amp(level_db) * unit(colour(pair(N, alike=0.63), air_colour))


def scene(blow_room_db=-4, track_room_db=-8):
    """Blows and rolling sounds with their room sound, over dry bumps and the hush."""
    # stereo balance of the track sounds: (frequency [Hz], left-right [dB])
    lean = [(60, -20), (110, 9.5), (200, -1.5), (380, 0.5), (700, -0.5), (1290, 0), (2380, 1), (4400, 2.5),
            (8120, 0), (15000, -4.5)]
    blows = knocks() + clinks()
    left, right = rattle() + runs() + funnel()
    left = colour(left, [(f, db / 2) for f, db in lean])
    right = colour(right, [(f, -db / 2) for f, db in lean])
    track = np.array([left, right])
    echo = room(amp(blow_room_db) * blows + amp(track_room_db) * track)
    return blows + track + echo + bumps() + hush()


def record(dry):
    """The recorder's band limit: a linear-phase low-pass."""
    lowpass = signal.firwin(255, 15950, window=("kaiser", 8), fs=SR)  # edge in Hz
    return signal.oaconvolve(dry, lowpass[None], "same")


dry = scene()
out = record(dry)
waveform_to_disk(out)
```